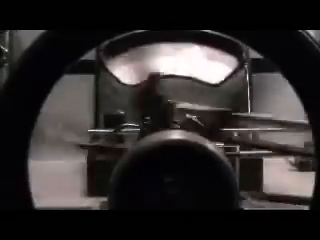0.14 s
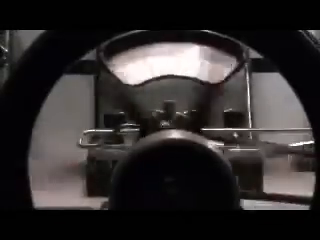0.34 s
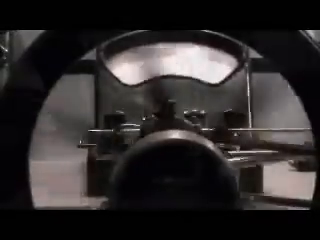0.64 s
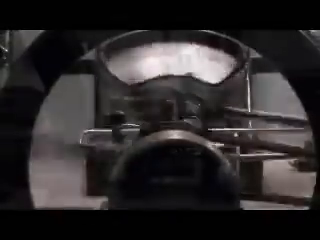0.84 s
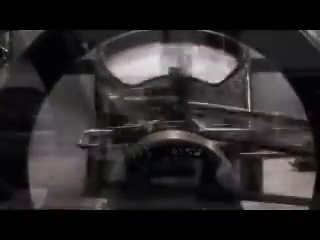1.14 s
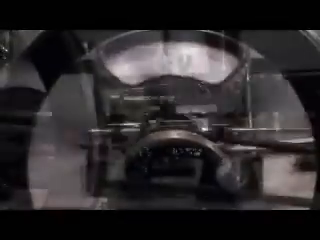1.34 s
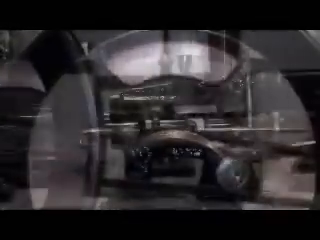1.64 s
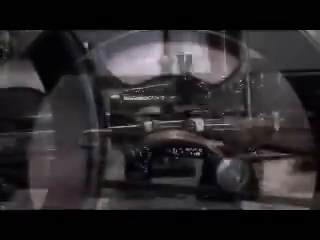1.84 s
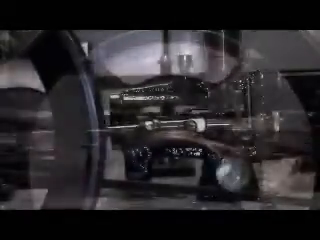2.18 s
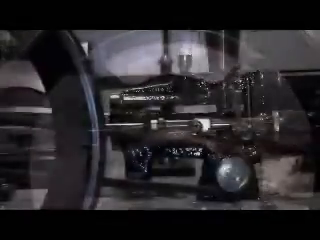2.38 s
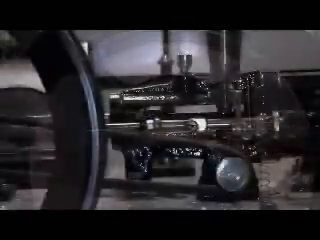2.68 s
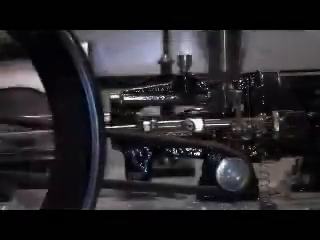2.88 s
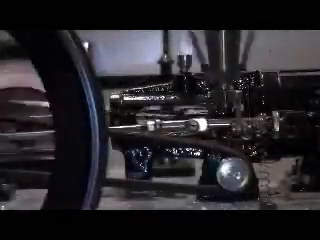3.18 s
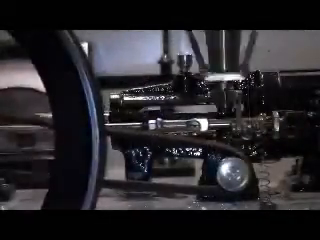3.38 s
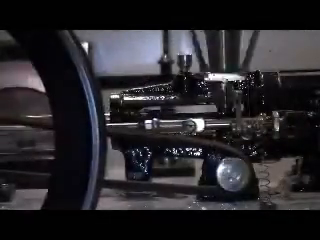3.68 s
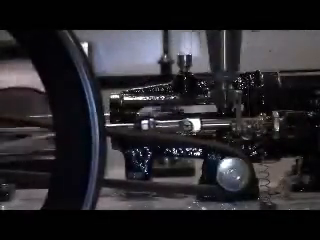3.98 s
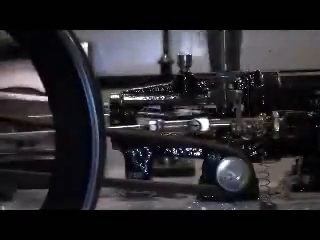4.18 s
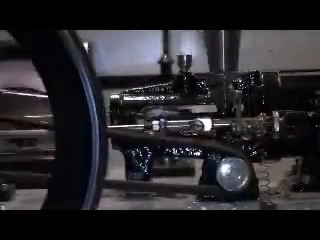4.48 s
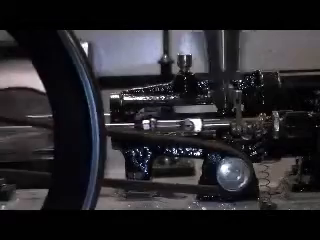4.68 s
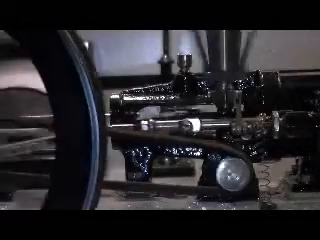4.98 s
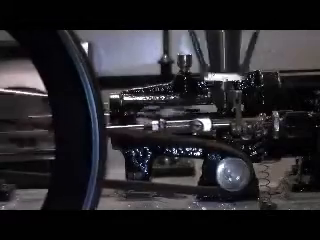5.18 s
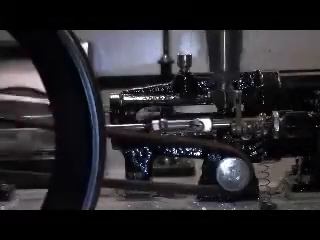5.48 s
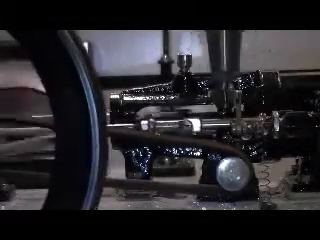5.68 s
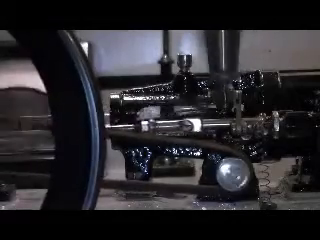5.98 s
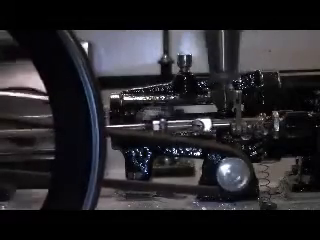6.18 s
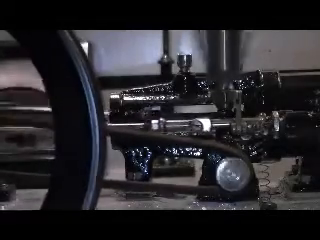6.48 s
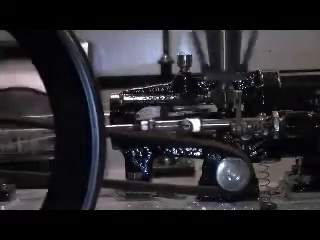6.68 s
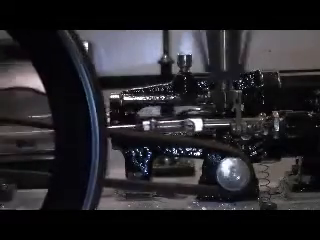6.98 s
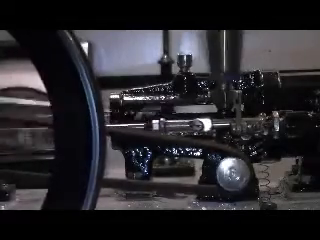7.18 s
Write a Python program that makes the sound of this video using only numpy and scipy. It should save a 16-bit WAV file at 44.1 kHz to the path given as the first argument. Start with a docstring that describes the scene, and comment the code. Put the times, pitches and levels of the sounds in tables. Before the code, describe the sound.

A small model steam engine runs fast, its bright hiss pulsing with rapid puffs, light metallic knocks and ticks, first farther off, then close.

```python
"""A distant, pulsing hiss of steam over a low rumble: a small bench engine at three turns a second.
The far sound dissolves into a close one. Steam leaks at the valve, louder on one half of each turn,
and puffs as the ports open and shut; the exhaust hisses, rings its pipe and now and then spurts wet.
Bearings rumble in the cast frame, the rods knock it into ringing at each dead centre, the bench
answers with a thud, and the linkage pins tick in their slack."""
import sys
import numpy as np
from scipy import signal
from scipy.fft import rfft, irfft, next_fast_len
from scipy.io import wavfile
from scipy.ndimage import uniform_filter1d

SR = 44100
rng = np.random.default_rng(int(sys.argv[2]) if len(sys.argv) > 2 else 0)


def transcribe(signal):
    """Save signal, clipped to [-1, 1], as a 16-bit WAV file at the path in sys.argv[1]."""
    frames = np.atleast_2d(signal).T
    limited = np.clip(frames, -1, 1)
    pcm = np.round(limited * 32767).astype(np.int16)
    wavfile.write(sys.argv[1], SR, pcm)


N = 323694
T = np.arange(N) / SR
HZ = np.fft.rfftfreq(N, 1 / SR)
FAR, CLOSE = 0, 1

# Cue sheet, far then close, a row per crank turn: outer dead centre t/s; level/dB of outer puff, inner
# puff, outer knock, inner knock, loud-half leak, quiet-half leak; level/dB of the outer and inner early
# puffs against their main puffs; bench thud level/dB against the inner knock
CRANK_TURNS = [
    [(-.119, -22, -22.5, -30, -31.5, -26.5, -31.5, -2, -1, -4),
     (.212, -22.5, -24.5, -28, -29, -29, -31.5, -1.7, -0.5, -6),
     (.534, -19.5, -23.5, -28, -32, -27.5, -32.5, -2, -5, -2),
     (.864, -21.5, -27, -28, -33.5, -29.5, -33.5, -2.5, 0.5, -1),
     (1.188, -24, -27, -29.5, -34.5, -28.5, -34, -1, -6, -3),
     (1.512, -22, -26, -30.5, -32.5, -29.5, -30.5, -2, -4, -3),
     (1.835, -21.5, -28, -33, -34.5, -30.5, -29.5, -2, -4, -4),
     (2.156, -25, -21, -29, -29, -34, -27, -2, -6, -3)],
    [(1.116, -17, -18.5, -36, -33, -24, -26, -3.5, -2, -4),
     (1.452, -19, -22, -38, -35, -29, -27.5, -3.5, -2, -4),
     (1.797, -17.5, -19.5, -34, -37, -24.5, -29, -6, -2, -5),
     (2.133, -19.5, -20, -35, -33, -26, -28.5, -3.5, -2, -7),
     (2.475, -19.5, -21, -34, -37, -26, -28, -3, -2, -5),
     (2.813, -18, -18.5, -37, -34, -24.5, -29, -4.5, -2, -2),
     (3.154, -17.5, -17.5, -38, -36, -22.5, -27.5, -3, -1.5, -11),
     (3.495, -17.5, -21, -35, -33, -23.5, -28, -2.5, -1.8, -3),
     (3.829, -17, -17.5, -37, -33.5, -23.5, -26.5, -5, -2, -5),
     (4.173, -15.5, -17.5, -30.5, -35, -23, -25.5, -7, -2, -3),
     (4.513, -15.5, -18, -33.5, -40, -23.5, -25.5, -9, -2.4, 0),
     (4.856, -16, -18, -32, -29.5, -25, -25.5, -3, -2.2, -10),
     (5.199, -15.5, -19, -36, -30, -26, -26, -3.5, -1, -8),
     (5.543, -17.5, -17.5, -37, -30, -24, -26.5, -3, -2, -9),
     (5.886, -18.5, -19, -36, -29, -24.5, -26, 0.5, -2, -10),
     (6.229, -18, -19.5, -32.5, -37, -23.5, -28, -1.5, -2, -4),
     (6.571, -17, -20.5, -33, -32, -23.5, -25.5, -4, 1, -7),
     (6.912, -17, -18.5, -33, -33.5, -24, -29, -6, -1.8, -9),
     (7.251, -17, -15, -33.5, -29, -24, -23, -4.5, -2, -2)],
]
# Extra puffs in mid-stroke: t/s, level/dB
MIDSTROKE_PUFFS = [(.06, -29), (2.202, -26), (2.536, -23.5), (2.886, -21), (3.558, -21), (4.244, -18.5),
                   (4.603, -19), (5.264, -21), (5.627, -21.5), (6.302, -20.5)]
# Wet spurts from the exhaust: t/s, length/s, level/dB
WET_SPURTS = [(1.787, 0.09, -32), (4.34, .17, -24), (4.52, 0.09, -29)]
# Tone colour of the hiss; above 11.5 kHz, a gap and a thin high band that are not part of the steam:
# f/Hz, relative level/dB
FAR_HISS_TONE = [(3000, -52), (5500, -32), (6600, -12), (7600, -6), (9500, 0), (10500, -9), (11300, -13.5),
                 (11900, -65), (12300, -18), (12900, -50)]
CLOSE_HISS_TONE = [(3000, -29), (5500, -23.5), (6600, -16), (7600, -10.5), (9300, -8), (10000, -8.5),
                   (10700, -12), (11250, -12.5), (11600, -27), (12000, -37), (12350, -14), (12650, -36),
                   (13000, -62)]
# Tone colour of the other noise layers: f/Hz, relative level/dB
EXHAUST_TONE = [(500, -22), (1400, -17.5), (2200, -11.5), (2620, -7), (3400, -7.5), (5200, -6),
                (6300, -8.5), (9000, -58)]
PIPE_TONE = [(1200, -25), (1600, -9), (2200, -2.5), (2500, -42)]
FRAME_TONE = [(70, -51), (125, -22), (160, -5), (700, -4), (1400, -7), (2500, -14), (5000, -53)]
RUMBLE_TONE = [(15, -16), (30, -16), (60, 0.5), (90, -4.5), (115, -1), (160, -5), (300, -24.5)]
SPURT_TONE = [(2000, -22), (3000, -6), (3700, -2), (4500, 2), (5600, -12), (7500, -44)]
# Resonances on top of those colours: f/Hz, width/Hz, relative level/dB
FAR_LEAK_RESONANCES = [(7170, 360, -1.5), (8430, 550, -0.5), (9030, 370, -0.5)]
CLOSE_LEAK_RESONANCES = [(7000, 540, -10), (8490, 370, -2), (8810, 310, -4)]
FAR_EXHAUST_RESONANCES = [(3000, 790, -9.5), (4080, 170, -0.5), (4290, 100, 4.5)]
CLOSE_EXHAUST_RESONANCES = [(3130, 95, -6), (4224, 550, -3.5), (4320, 170, -3), (4640, 180, -3)]
PIPE_RESONANCES = [(1882, 200, 0.3), (2000, 54, -1)]
FRAME_RESONANCES = [(460, 24, -9), (523, 17, -5.5), (898, 49, -2.5)]
# Level over time of the pipe's ring and the low rumble; the rumble drops out briefly near the start:
# t/s, level/dB
PIPE_LEVELS = [(0, -52), (.6, -46), (1.2, -50), (2, -47.5), (2.6, -47), (3.2, -41), (3.9, -44), (4.2, -41),
               (4.5, -40.5), (5.2, -44), (5.7, -46), (6.1, -38.5), (6.5, -44), (6.8, -43), (7.34, -43)]
RUMBLE_LEVELS = [(0, -48), (.2, -66), (.26, -80), (.48, -80), (.55, -63), (1, -56), (2.6, -51.5),
                 (4.5, -50), (5.5, -52), (6.3, -53), (7.34, -52.5)]
# Rod blows, far then close, outer then inner:
# t/s from dead centre, length/s, upper f/Hz, lower f/Hz, lower level/dB against the upper
ROD_BLOWS = [
    [(.004, 0.021, 946, 440, 1), (-.005, 0.018, 1050, 325, 2)],
    [(.004, 0.0081, 910, 490, -5.5), (-.008, 0.029, 950, 530, -10)],
]
# Faint, slow-swelling valve tap, close only: t/s from outer dead centre, length/s, level/dB,
# upper f/Hz, lower f/Hz, lower level/dB and thud level/dB against the upper
VALVE_TAP = (0, 2.5, -52, 940, 610, 13, -11)
# Modes of the cast frame: f/Hz, t60/s
CASTING_MODES = [(250, 0.061), (310, 0.09), (378, 0.1), (444, 0.19), (500, 0.099), (620, 0.05),
                 (760, 0.052), (845, .12), (905, 0.13), (990, 0.049), (1100, 0.15), (1230, .04)]
# The bench's late answer to a blow: f/Hz, t60/s, delay/s, swell/s
BENCH_MODE = (180, 0.19, .014, 0.015)
# Featured linkage ticks: t/s, relative body level/dB, relative bright level/dB, dulling/(dB per octave)
LOUD_TICKS = [(0.025, -25, -9.5, 3), (0.1885, -19, -31, 5), (0.197, -25, -14, 2), (0.3542, -20, -16, 5),
              (0.375, -18, -17, 5), (0.6006, -21, -22, 0), (.6342, -21, -22, 0), (.7606, -29, -25, 0),
              (.8435, -26, -26, -2), (0.8689, -17, -17, 5), (0.9786, -24, -27, 0), (2.117, -19.5, -30, 8),
              (2.143, -19, -25, 5), (2.2887, -17, -19, 2), (2.313, -19, -33, 4), (2.45, -17, -23, 3),
              (2.464, -27, -14, 6), (2.7897, -17, -17, 5), (2.823, -21, -17, 7), (3.3075, -13, -18, 6),
              (3.6533, -16, -29, 4), (3.7268, -20.5, -10, 3), (3.816, -19.5, -20, 4),
              (4.1543, -17.5, -25, -4), (4.324, -22, -10, 2), (4.4334, -26, -41, -2), (4.4954, -14, -25, 8),
              (5.536, -31, -9, 2), (5.737, -19.5, -20, -2), (5.859, -17, -35, 3), (6.558, -19, -17, 3),
              (6.692, -20, -18, 1), (6.6376, -31, -11, 1), (6.723, -23, -10, -2), (6.8881, -10.5, -13, 3),
              (7.067, -16, -9, 10), (7.168, -23.5, -12, -3), (7.232, -16, -16, 6)]
# Body and bright top of a tick: f/Hz, relative level/dB, t60/s
TICK_BODY_MODES = [(886, -11, 0.013), (1897, -8.5, 0.022), (2100, 4, 0.0046), (3230, 3.5, 0.0064),
                   (4300, 5, 0.0054)]
TICK_BRIGHT_MODES = [(7040, -3, 0.0033), (8240, 6, 0.0074), (9600, -27, 0.0036)]
# Stereo width: f/Hz, side level/dB against mid
WIDTH = [(30, -23), (100, -60), (2600, -60), (3000, -23), (4000, -17), (5800, -12.5), (8500, -10.5),
         (11000, -3.5), (12300, -14)]
# Lean to the left: f/Hz, left level/dB against right
LEFT_LEAN = [(5000, 0), (6900, 1.2), (8500, 2.4), (10500, 2.0), (12000, .2)]
# Phase lead of the left channel: f/Hz, phase/rad
LEFT_LEAD = [(4400, -0.038), (6600, -0.73), (8400, 0.81), (9200, -1.4), (10200, -1.5), (11100, -1.24),
             (11600, 0)]

# Pairs are (far, close).
INNER_S, SHUT_S = (.137, .143), (0.036, 0.026)  # outer to inner dead centre; from there to port shutting
EARLY_S, EARLY_LENGTH_S = (0.021, 0.024), 0.012  # an early puff runs ahead of each main puff
PUFF_LENGTH_S, PUFF_EXHAUST_DB = (0.016, 0.018), [(-5, -5.5), (-9.5, -9)]  # exhaust share: outer, inner
LOUD_DRIFT_DB, QUIET_DRIFT_DB = (-6.5, 0.5), (-6.5, -4.5)  # change of the leak through each half turn
EXHAUST_DB, BEARING_DB, OUTER_THUD_DB = (-35, -32), (-39.5, -38.5), (-18, -25)  # thud: against its knock
BLOW_SPREAD = 0.046  # each blow lands a little elsewhere, which shifts its pitches


def gain_of(db):
    """Decibels to gain."""
    return 10 ** (np.asarray(db) / 20)


def unit_rms(x):
    """Scales to rms 1."""
    return x / np.sqrt(np.mean(x ** 2) + 1e-20)


def curve_at(points, hz):
    """Reads a curve on a log-frequency axis."""
    f, value = np.transpose(points)
    return np.interp(np.log(hz + 1), np.log(f + 1), value)


def hiss(tone, resonances=()):
    """Two unrelated rows of steady coloured noise, rms 1."""
    size = next_fast_len(N, real=True)
    f = np.fft.rfftfreq(size, 1 / SR)
    power = gain_of(2 * curve_at(tone, f))
    for hz, width, db in resonances:
        power += gain_of(2 * db) / (1 + (2 * (f - hz) / width) ** 2) ** 2
    real, imag = rng.standard_normal((2, 2, len(f)))
    return unit_rms(irfft((real + 1j * imag) * np.sqrt(power), size)[:, :N])


def wander(seconds):
    """Random modulation of rms 1 that moves over the given time."""
    span = max(int(seconds * SR), 2)
    return unit_rms(uniform_filter1d(uniform_filter1d(rng.standard_normal(N), span), span))


def crossfade(place, start_s=0.81, end_s=2.77, bend=1.53):
    """Power share of a listening place as far dissolves into close."""
    share = np.clip((T - start_s) / (end_s - start_s), 0, 1)
    return (share if place == CLOSE else 1 - share) ** bend


def dead_centres(place):
    """Times at which the piston turns round: a row of (outer, inner) per turn."""
    outer_s = np.array(CRANK_TURNS[place])[:, 0]
    return np.c_[outer_s, outer_s + INNER_S[place]]


def stroke_power(place, edge_s, dip_db, dip_s, mean_db=None, follow=1, rise_db=0):
    """Half-turn pulse of the leak, or of a layer that partly follows it; dips after the port shuts."""
    starts = (dead_centres(place) + [-EARLY_S[place], SHUT_S[place]]).ravel()
    lengths = np.diff(starts, append=starts[-1] + np.diff(starts).mean())
    leak_db = np.array(CRANK_TURNS[place])[:, 5:7].ravel()
    half = np.maximum(np.searchsorted(starts, T, "right") - 1, 0)
    quiet = half % 2
    since = np.maximum(T - starts[half], 0)
    ramp = np.minimum(since / lengths[half], 1) - .5
    db = leak_db[half] + np.where(quiet, QUIET_DRIFT_DB[place], LOUD_DRIFT_DB[place]) * ramp
    if mean_db:
        db = mean_db[place] + follow * (db - leak_db.mean()) + quiet * rise_db * ramp
    db -= quiet * dip_db * np.exp(-(since / dip_s) ** 2)
    return gain_of(2 * uniform_filter1d(db, max(int(edge_s * SR), 1)))


def burst_power(starts, levels_db, lengths, attack_share, tail_s):
    """Power envelope of bursts: curved attack, short hold, dying tail."""
    power = np.zeros(N)
    for start, db, length in zip(starts, levels_db, lengths):
        if 0 <= start < N / SR:
            i = int(start * SR)
            t = T[:min(int((length + 8 * tail_s) * SR), N - i)]
            attack = np.clip(t / (attack_share * length), 0, 1) ** 2
            tail = np.exp(-np.maximum(t - 0.69 * length, 0) / tail_s)
            power[i:i + len(t)] = np.maximum(power[i:i + len(t)], gain_of(2 * db) * attack * tail)
    return power


def puff_cues(place):
    """Main, early and mid-stroke puffs of the ports: t/s, level/dB, length/s, exhaust share/dB."""
    turns, s = np.array(CRANK_TURNS[place]), dead_centres(place).ravel()
    db, early_db = turns[:, 1:3].ravel(), turns[:, 7:9].ravel()
    share_db = np.tile(PUFF_EXHAUST_DB[place], len(turns))
    main = np.c_[s, db, np.full(len(s), PUFF_LENGTH_S[place]), share_db]
    early = np.c_[s - EARLY_S[place], db + early_db, np.full(len(s), EARLY_LENGTH_S), share_db]
    midstroke = [(*puff, EARLY_LENGTH_S, share_db[1]) for puff in MIDSTROKE_PUFFS]
    return np.vstack([main, early, midstroke]).T


def valve_flick(place, change_db=(4, -1), before_s=.003, width_s=0.0025):
    """Power gain of the steam just before each dead centre: a spike from afar, a slight choke close by."""
    s = dead_centres(place).ravel() - before_s
    nearest = np.searchsorted((s[1:] + s[:-1]) / 2, T)
    return gain_of(2 * change_db[place] * np.exp(-((T - s[nearest]) / width_s) ** 2))


def valve_leak(place):
    """Steam escapes at the valve: a bright hiss that pulses with the stroke and puffs at the ports."""
    s, db, length, _ = puff_cues(place)
    puffs = burst_power(s, db, length, attack_share=0.26, tail_s=0.0087)
    stroke = stroke_power(place, edge_s=0.0067, dip_db=4.6, dip_s=0.038)
    colours = [(FAR_HISS_TONE, FAR_LEAK_RESONANCES), (CLOSE_HISS_TONE, CLOSE_LEAK_RESONANCES)]
    return np.sqrt(np.maximum(stroke, puffs)) * hiss(*colours[place])


def exhaust_puffs(place):
    """Power of the share of each puff that leaves by the exhaust."""
    s, db, length, share_db = puff_cues(place)
    return burst_power(s, db + share_db, length, attack_share=0.51, tail_s=0.0066)


def exhaust(place):
    """Spent steam: a darker hiss with softer puffs, leaning towards the end of the quiet half turn."""
    stroke = stroke_power(place, edge_s=0.013, dip_db=1.9, dip_s=0.024,
                          mean_db=EXHAUST_DB, follow=0.54, rise_db=4)
    resonances = [FAR_EXHAUST_RESONANCES, CLOSE_EXHAUST_RESONANCES][place]
    return np.sqrt(np.maximum(stroke, exhaust_puffs(place))) * hiss(EXHAUST_TONE, resonances)


def wet_steam():
    """Water drops in the steam make leak and exhaust sputter together."""
    sputter, surge = wander(0.0022), wander(0.011)
    out = 0
    for place in (FAR, CLOSE):
        leak = gain_of(0.56 * sputter + 0.47 * surge) * valve_leak(place)
        spent = gain_of(0.99 * sputter + 0.78 * surge) * exhaust(place)
        out += np.sqrt(crossfade(place) * valve_flick(place)) * (leak + spent)
    return out


def exhaust_pipe():
    """The pipe rings breathily near 2 kHz, pushed a little by each puff."""
    power = gain_of(2 * np.interp(T, *np.transpose(PIPE_LEVELS)))
    for place in (FAR, CLOSE):
        power += crossfade(place) * gain_of(-17.5) * exhaust_puffs(place)
    return np.sqrt(power) * gain_of(2.3 * wander(0.036)) * hiss(PIPE_TONE, PIPE_RESONANCES)


def low_rumble():
    """Lumpy low bed of bench and room."""
    return gain_of(np.interp(T, *np.transpose(RUMBLE_LEVELS)) + 1.4 * wander(0.092)) * hiss(RUMBLE_TONE)


def bearings(blows):
    """Bearings rumble in the casting; each blow shakes it harder."""
    s, length, _, upper_db = np.transpose(blows)[:4]
    power = burst_power(s, upper_db - 2.5, length, attack_share=0.18, tail_s=0.02)
    for place in (FAR, CLOSE):
        stroke = stroke_power(place, edge_s=0.019, dip_db=1, dip_s=0.12, mean_db=BEARING_DB, follow=0.61)
        power += crossfade(place) * stroke
    return np.sqrt(power) * gain_of(1.75 * wander(0.01)) * hiss(FRAME_TONE, FRAME_RESONANCES)


def blow_cues():
    """Valve taps and rod blows, crossfaded: each row is t/s, then the arguments of knock()."""
    tap_s, tap_length, tap_db, *tap_colour = VALVE_TAP
    blows = [(CLOSE, s + tap_s, tap_db, tap_length, *tap_colour) for s in dead_centres(CLOSE)[:, 0]]
    for place in (FAR, CLOSE):
        turns = np.array(CRANK_TURNS[place])
        thuds_db = np.c_[np.full(len(turns), OUTER_THUD_DB[place]), turns[:, 9]]
        for end, (offset_s, *shape) in enumerate(ROD_BLOWS[place]):
            for s, db, thud_db in zip(dead_centres(place)[:, end], turns[:, 3 + end], thuds_db[:, end]):
                blows.append((place, s + offset_s, db, *shape, thud_db))
    shares, cues = [crossfade(FAR), crossfade(CLOSE)], []
    for place, s, db, length, upper_hz, lower_hz, lower_db, thud_db in blows:
        if 0 <= s < N / SR:
            db += 10 * np.log10(shares[place][int(s * SR)] + 1e-9)
            cues.append((s, length, upper_hz, db, lower_hz, db + lower_db, db + thud_db))
    return cues


def swelling(t, swell_s, t60):
    """Envelope of a ring that builds up, then dies."""
    return np.clip(t / swell_s, 0, 1) ** 2 * gain_of(-60 * np.maximum(t - swell_s, 0) / t60)


def knock(length, upper_hz, upper_db, lower_hz, lower_db, thud_db):
    """A soft blow rings the casting's modes near its two pitches, low modes later; the bench thuds."""
    t = T[:8000]
    draws = rng.random((len(CASTING_MODES), 4))
    detune = 1 + BLOW_SPREAD * (draws[:, 3] - .5)
    upper_hz, lower_hz = upper_hz * detune[0], lower_hz * detune[1]
    bench_hz, bench_t60, delay_s, swell_s = BENCH_MODE
    thud = np.sin(2 * np.pi * (bench_hz * detune[3] * t + draws[2, 3]))
    out = gain_of(thud_db) * swelling(t - delay_s, swell_s, bench_t60) * thud
    for (hz, t60), (phase, shift, weakening, _) in zip(CASTING_MODES, draws):
        db = max(upper_db - 6 * ((hz - upper_hz) / 95) ** 2, lower_db - 6 * ((hz - lower_hz) / 90) ** 2)
        loaded_hz = hz * (1 + 0.031 * (shift - .5))  # the load on the rod shifts each mode a little
        envelope = swelling(t - 2.75 / hz, 0.16 * length + 3.5 / hz, t60)
        out += gain_of(db - 5.4 * weakening) * envelope * np.sin(2 * np.pi * (loaded_hz * t + phase))
    return out


def reflections(x, t60):
    """Sparse echoes of random sign from bench and walls."""
    delays = np.arange(40, 6000, 20) + rng.integers(0, 20, 298)
    taps = np.zeros(6020)
    taps[delays] = rng.choice([-1., 1.], 298) * gain_of(-60 * delays / SR / t60)
    return signal.oaconvolve(x, taps / np.linalg.norm(taps))[:N]


def widened(x):
    """Two rows: the sound itself for the mid, its short reflections for the side."""
    return np.array([x, reflections(x, t60=0.021)])


def frame_knocks(blows):
    """The casting rings at every dead centre, with a short room tail."""
    rings = np.zeros(N + 8000)
    for s, *blow in blows:
        rings[int(s * SR):][:8000] += knock(*blow)
    rings = rings[:N] * gain_of(wander(0.0055))  # the rod chatters against the pin
    rings = signal.sosfilt(signal.butter(4, 120, "high", fs=SR, output="sos"), rings)
    return widened(rings + gain_of(-10.0) * reflections(rings, t60=0.21))


def ring(modes, detune, t):
    """Struck metal: a sum of dying modes."""
    return sum(gain_of(db - 60 * t / t60) * np.sin(2 * np.pi * hz * ratio * t)
               for (hz, db, t60), ratio in zip(modes, detune))


def linkage_ticks(small_per_s=45, spread_db=3.5, small_dulling=2, attack_s=0.00013):
    """Pins slap in their slack: the featured ticks on cue, many small ones scattered by chance."""
    when, softness, brightness = rng.random((int(small_per_s * N / SR), 3)).T
    small_s = when * N / SR
    small_db = -36 - spread_db * np.log(0.04 + softness)
    small_db += 4 * np.interp(small_s, T, crossfade(CLOSE))  # louder from close by
    small = np.c_[small_s, small_db, small_db + 12 * (brightness - .3), np.full(len(when), small_dulling)]
    t, out = T[:2000], np.zeros(N + 2000)
    pivot_hz = TICK_BODY_MODES[1][0]
    for s, body_db, bright_db, dulling in np.vstack([LOUD_TICKS, small]):
        detune = rng.uniform(0.925, 1.07, 8)
        modes = [(hz, db - dulling * np.log2(hz / pivot_hz), t60) for hz, db, t60 in TICK_BODY_MODES]
        body = gain_of(body_db - 2.5) * ring(modes, detune, t)
        bright = gain_of(bright_db - 4.5) * ring(TICK_BRIGHT_MODES, detune[5:], t)
        out[int(s * SR):][:2000] -= (body + bright) * np.minimum(t / attack_s, 1)
    ticks = signal.sosfilt(signal.butter(2, 500, "high", fs=SR, output="sos"), out[:N])
    return widened(ticks + gain_of(-8.5) * reflections(ticks, t60=0.028))


def spurts():
    """The exhaust spits longer, fluttering bursts of wet steam."""
    s, length, db = np.transpose(WET_SPURTS)
    power = burst_power(s, db, length, attack_share=0.66, tail_s=0.037)
    return np.sqrt(power) * gain_of(1.2 * wander(0.0082)) * hiss(SPURT_TONE)


def scene():
    """Mixes the layers as mid and side rows, then spreads them to stereo, widest in the treble."""
    blows = blow_cues()
    mix = wet_steam() + exhaust_pipe() + low_rumble() + bearings(blows)
    mix += frame_knocks(blows) + linkage_ticks() + spurts()
    notch = gain_of(-6 * np.exp(-((HZ - 2640) / 120) ** 2))  # the bounce off the bench cancels this band
    width = gain_of(curve_at(WIDTH, HZ))
    mid, side = notch * rfft(mix) / np.sqrt(1 + width ** 2)
    lean = gain_of(curve_at(LEFT_LEAN, HZ) / 2) * np.exp(.5j * curve_at(LEFT_LEAD, HZ))
    return np.array([irfft((mid + width * side) * lean, N), irfft((mid - width * side) / lean, N)])


def record(dry):
    """A steep low-pass trims the air above 13.1 kHz."""
    return signal.oaconvolve(dry, signal.firwin(511, 13100, window=("kaiser", 9), fs=SR)[None], "same")


dry = scene()
out = record(dry)
transcribe(out)
```